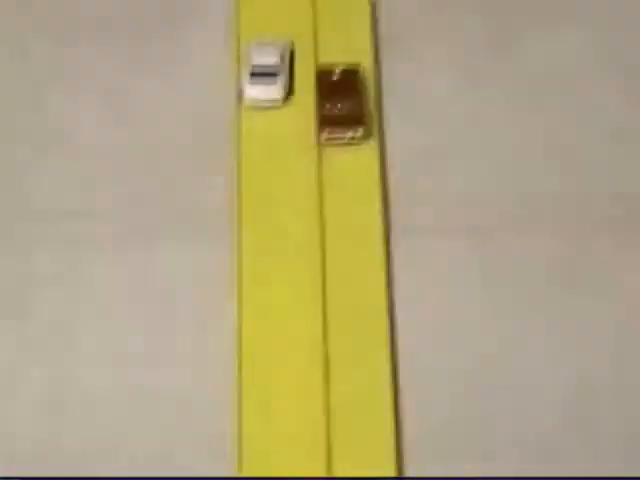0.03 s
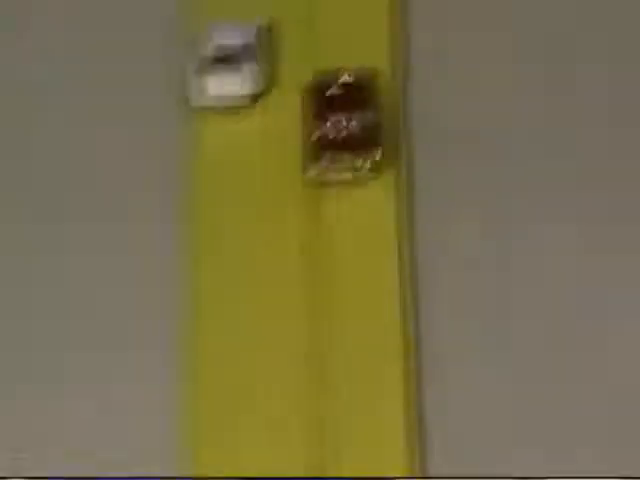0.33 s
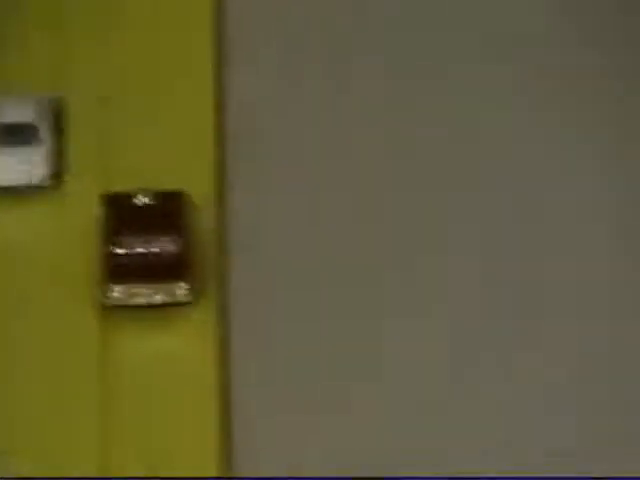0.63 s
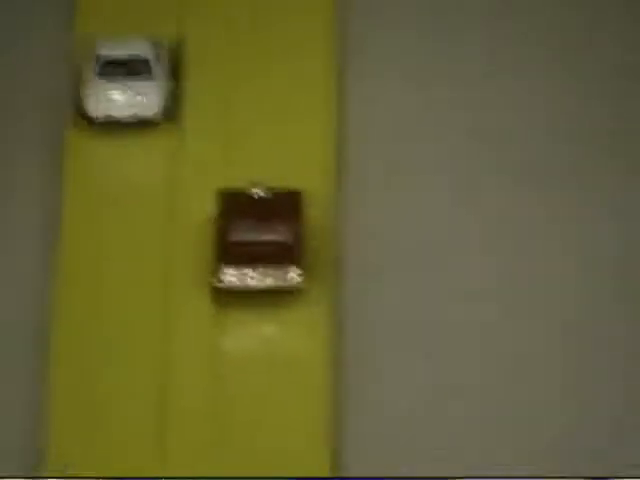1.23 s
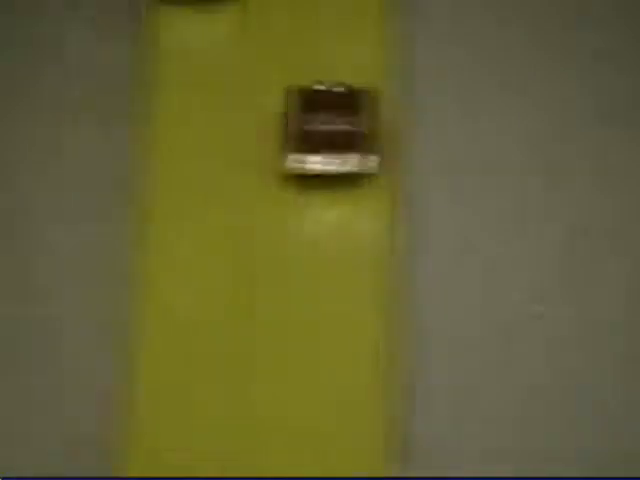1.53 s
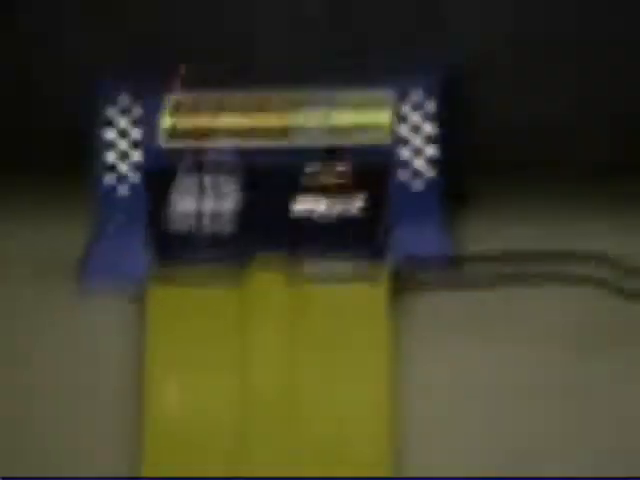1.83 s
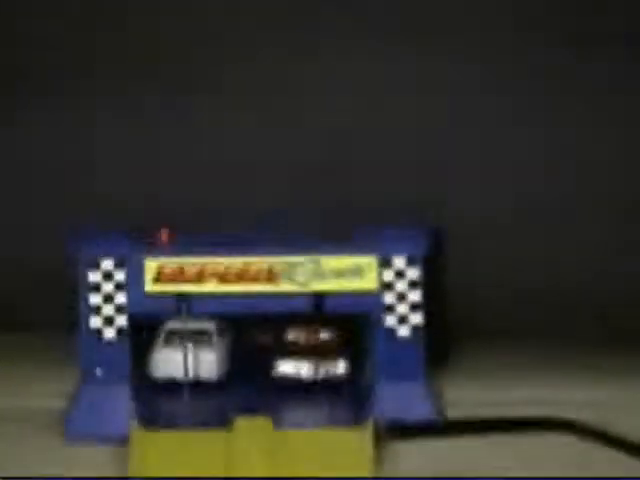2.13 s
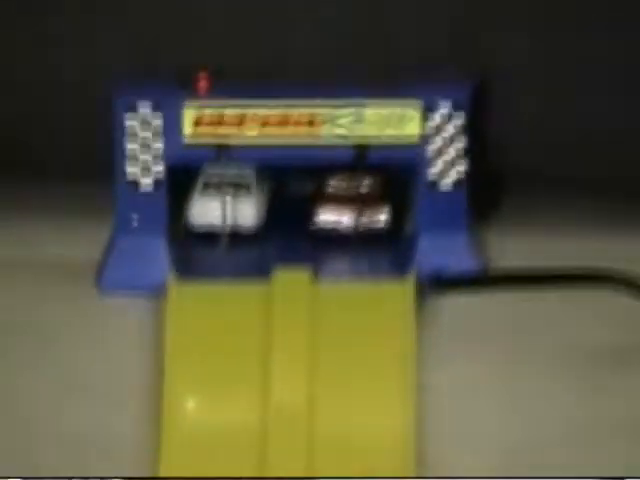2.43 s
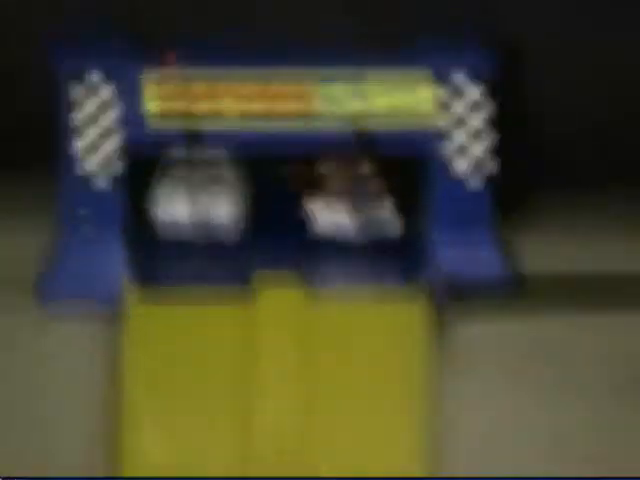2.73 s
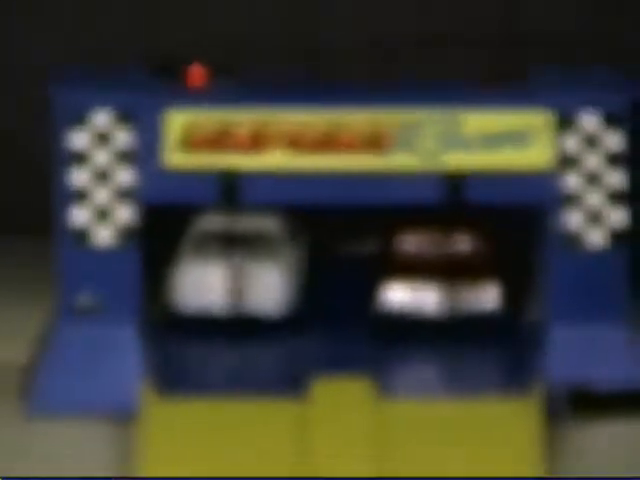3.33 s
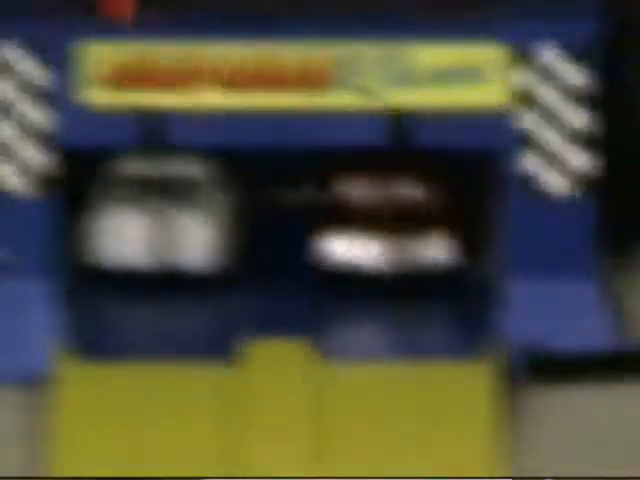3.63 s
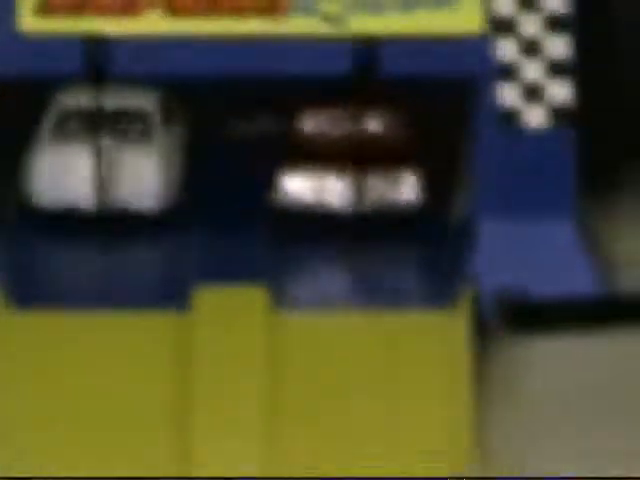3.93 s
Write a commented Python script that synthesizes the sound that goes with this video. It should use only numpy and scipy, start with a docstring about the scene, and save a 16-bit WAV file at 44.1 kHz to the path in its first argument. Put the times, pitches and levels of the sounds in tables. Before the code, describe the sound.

Small toy cars roll down a plastic track with a close, fizzing rattle, then click and thud to a stop. Three farther clacks ring in a hard-walled room, leaving quiet room noise and a brief knock on the microphone.

```python
"""Two toy cars race down a plastic track and click to a stop in the finish gate, a camera close behind.
Tiny random bumps make the wheels rattle, the axles fizz and, on the first stretch, the track drum.
After the stop, three farther clacks ring in the hard-walled room. Under it all lie quiet room noise
and the camera's faint whine, with a few hollow knocks of its case."""
import sys
import numpy as np
from scipy import signal
from scipy.fft import rfft, irfft
from scipy.io import wavfile

SR = 44100
rng = np.random.default_rng(int(sys.argv[2]) if len(sys.argv) > 2 else 0)


def persist_wave(psi):
    """Save psi, clipped to +-1, as 16-bit WAV."""
    counts = np.round(np.clip(psi, -1, 1) * 32767).astype(np.int16)
    wavfile.write(sys.argv[1], SR, np.atleast_2d(counts).T)


N = 176400

# Fader for the axles' treble. Each row: time in seconds, level in dB.
AXLE_LEVEL = [(0, -24.5), (.55, -25.5), (1.0, -28), (1.14, -29), (1.3, -29.5), (1.75, -28.5), (1.87, -32.5),
              (1.97, -30), (2.03, -37), (2.12, -67), (2.25, -85)]
# Tone of a small plastic click. Each row: frequency in Hz, relative level in dB.
CLICK_EQ = [(120, -27), (400, 2.5), (1300, 7), (3000, -4), (6000, 9), (8000, 7.5), (10000, 0),
            (12000, -7.5), (14500, -28)]
# Stereo image in the room. Each row: frequency in Hz, left-right likeness (1 is mono).
ROOM_LIKENESS = [(100, 0.59), (500, 0.91), (1400, 0.98), (3000, 0.91), (5500, 0.81), (9000, 0.37),
                 (13000, 0.32)]
BUMPS_PER_S, BUMP_SPREAD_DB = 1500, 2


def amp(db):
    """Decibels to gain."""
    return 10 ** (np.asarray(db) / 20)


def unit(x):
    """Scales to rms 1."""
    return x / np.sqrt(np.mean(x ** 2) + 1e-20)


def read(points, hz):
    """Reads a spectrum on a log-frequency axis."""
    f, value = np.transpose(points)
    return np.interp(np.log(hz + 1), np.log(f + 1), value)


def curve(rows, column=1):
    """One column of a control curve at every sample."""
    rows = np.array(rows)
    return np.interp(np.arange(N) / SR, rows[:, 0], rows[:, column])


def add(mix, start_s, sound):
    """Mixes a sound in at a time."""
    part = mix[max(round(start_s * SR), 0):][:len(sound)]
    part += sound[:len(part)]


def colour(x, eq):
    """Minimum-phase EQ of unit energy."""
    log_gain = np.log(amp(read(eq, abs(np.fft.fftfreq(4096, 1 / SR)))))
    taps = np.fft.ifft(np.exp(np.conj(signal.hilbert(log_gain)))).real[:2048]
    return signal.fftconvolve(x, taps / np.linalg.norm(taps))[:N]


def wander(hz):
    """Smooth random movement up to a rate, rms 1."""
    f = np.fft.rfftfreq(N, 1 / SR)
    return unit(irfft(rfft(rng.standard_normal(N)) * (f > 0) / (1 + (f / hz) ** 4), N))


def impacts(per_s, spread_db):
    """Random tiny blows of uneven size."""
    size = amp(spread_db * np.minimum(rng.exponential(1, N), 3))
    return unit(size * rng.choice([-1, 1], N) * (rng.random(N) < per_s / SR))


def pair(a, b, likeness):
    """Two unrelated signals become a left and right of the given likeness."""
    alike = np.clip(read(likeness, np.fft.rfftfreq(len(a), 1 / SR)), -1, 1)
    mid, side = rfft(a) * np.sqrt((1 + alike) / 2), rfft(b) * np.sqrt((1 - alike) / 2)
    return irfft([mid + side, mid - side], len(a))


def room(x):
    """Diffuse tail of a hard-walled room, each band dying at its own speed."""
    # Each row: frequency in Hz, seconds to fall 60 dB.
    reverb_times = [(200, 0.99), (800, 1), (2000, 0.84), (5500, 0.72), (12000, 0.4)]
    noise = rng.standard_normal((2, SR)) * (np.arange(SR) > .004 * SR)  # 4 ms pre-delay
    hz, t, bands = signal.stft(noise, SR, nperseg=256)
    decay = amp(-60 * t / read(reverb_times, hz)[:, None])
    tails = signal.istft(bands * decay, SR, nperseg=256)[1][:, :SR]
    stereo_tail = pair(*tails, ROOM_LIKENESS)
    return signal.fftconvolve(x[None], stereo_tail / np.linalg.norm(stereo_tail[0]), axes=1)


def in_room(x, wet_db):
    """Direct sound plus its tail."""
    return x + amp(wet_db) * room(x)[:, :N]


def snaps(hits, eq, decay_s, scatter, tick=1):
    """Hard little blows: a tick and a short burst of noise, whose gain is scatter."""
    out, t = np.zeros(N), np.arange(SR // 10) / SR
    for start_s, db in hits:
        burst = tick * (t == 0) + scatter * rng.standard_normal(len(t)) * np.exp(-t / decay_s)
        add(out, start_s, amp(db) * burst)
    return colour(out, eq)


def struck(hits, modes, attack_s=0.0011):
    """Soft blows ring damped modes, each with its own phase gap between left and right."""
    out, t = np.zeros((2, N)), np.arange(SR // 2) / SR
    attack = 1 - np.exp(-(t / attack_s) ** 2)
    for channel, side in zip(out, (-.5, .5)):
        ring = sum(amp(db - 60 * t / t60) * np.sin(2 * np.pi * hz * t + side * gap)
                   for hz, db, t60, gap in modes)
        for start_s, level_db in hits:
            add(channel, start_s, amp(level_db) * attack * ring)
    return out


def ringing(hz, flutter_db=2.5):
    """A resonance kept ringing by random bumps: a sine whose strength and phase wander."""
    phase = 2 * np.pi * (np.cumsum(hz * np.ones(N)) / SR + rng.random()) + .3 * wander(hz=8)
    return unit(amp(flutter_db * np.tanh(wander(hz=12))) * np.sin(phase))


def room_tone():
    """A quiet, wide bed of room noise and microphone hiss."""
    # Each row: frequency in Hz, relative level in dB.
    bed_eq = [(15, 10.5), (30, 18), (48, -1), (70, 7), (150, 2), (210, 2.5), (270, 8), (380, 4), (750, 1),
              (1050, 4), (2000, -4.5), (4000, -9.5), (7000, -14), (8500, -12), (11700, -16.5), (12500, -26),
              (15500, -31)]
    # Each row: frequency in Hz, left-right likeness.
    bed_likeness = [(30, 0.41), (200, 0.056), (1000, 0.033), (2000, 0.33), (7000, 0.097), (12000, .1)]
    return amp(-55.5) * pair(*[colour(rng.standard_normal(N), bed_eq) for side in range(2)], bed_likeness)


def camera_whine(hum_hz=996, buzz_hz=99.87):
    """The camera's wavering hum and its octave, a cluster of high tones and a thin buzz."""
    # Each row: time in seconds, level in dB.
    hum_level = [(2.4, -67), (2.68, -62), (3.0, -67), (3.16, -62), (3.22, -76), (3.33, -70), (3.44, -60),
                 (3.6, -73), (3.72, -63.5)]
    # Each row: frequency in Hz, level in dB.
    whine_tones = [(2697, -81), (3112, -79), (3295, -81), (3596, -81), (3898, -77), (4194, -80),
                   (4797, -79), (4888, -79), (5093, -77), (5873, -82), (6293, -79), (7854, -78),
                   (7881, -78), (8280, -84), (8446, -83), (9292, -84), (9593, -82), (10051, -86),
                   (10632, -85)]
    t = np.arange(N) / SR
    hum_phase = 2 * np.pi * hum_hz * t
    hum = amp(curve(hum_level) + 2 * wander(hz=12)) * np.sin(hum_phase + .5 * wander(hz=14))
    octave = amp(-74 + 3.5 * wander(hz=5)) * np.sin(2 * hum_phase + wander(hz=10))
    whine = sum(amp(db + 1.5 * wander(hz=3.4)) * np.sin(2 * np.pi * (hz * t + rng.random()))
                for hz, db in whine_tones)
    cycles = buzz_hz * t + .002 * wander(hz=6)
    buzz = sum(amp(-93 + 4 * rng.standard_normal()) * np.sin(2 * np.pi * (k * cycles + rng.random()))
               for k in range(20, 118))  # upper harmonics only
    return hum + octave + whine + buzz


def camera_knocks():
    """The camera's case knocks in the hand: a short crack and a hollow ring."""
    # Each row: start in seconds, relative level in dB.
    knocks = [(.9405, -16.5), (2.371, -42), (3.832, -52), (3.9845, -28.5), (3.9882, -30), (3.9903, -18)]
    # Each row: frequency in Hz, relative level in dB, seconds to fall 60 dB, phase gap in radians.
    case_modes = [(566, -18, 0.079, .3), (774, 2.5, 0.027, 0.66), (1127, 10.5, 0.05, 2.23),
                  (1904, -4, 0.018, 0.68), (2270, -6.5, 0.025, 0.81), (3270, -3.5, 0.014, 1.1),
                  (5730, -8, 0.011, 1)]
    # Each row: frequency in Hz, relative level in dB.
    crack_eq = [(100, -35), (300, -13), (800, 9), (1500, -6), (4500, -11), (9000, -13.5), (12000, -19),
                (14000, -43)]
    cracks = [snaps(knocks, crack_eq, decay_s=0.0025, scatter=0.27) for side in range(2)]
    return struck(knocks, case_modes) + amp(7.5) * pair(*cracks, ROOM_LIKENESS)


def far_clacks(bounce_s=0.018, bounce_db=-6, decay_s=.0045, dry_db=-5.5):
    """Plastic clacks with one quick bounce: a bright burst, then the room's darker, even answer."""
    # Each row: start in seconds, relative level in dB.
    clacks = [(2.276, -5.5), (2.496, -11), (2.747, -19)]
    # Tone of the burst and of the answer. Each row: frequency in Hz, relative level in dB.
    burst_eq = [(200, -24), (800, -15), (2000, 1), (4500, -1), (8000, 10), (10000, 2), (12000, -10),
                (14500, -22)]
    answer_eq = [(200, -15.5), (700, -2), (1350, 7), (2200, 5.5), (3300, 1), (4300, 4), (5400, 1),
                 (7200, 1), (10000, -2.5), (12000, -13), (14500, -26)]
    bounces = [(start_s + bounce_s, db + bounce_db) for start_s, db in clacks]
    direct = snaps(list(clacks) + bounces, burst_eq, decay_s, scatter=.1, tick=.2)
    answer = sum(room(snaps([clack], answer_eq, decay_s, scatter=0))[:, :N] for clack in clacks)
    return amp(dry_db) * direct + answer


def joints_and_gate():
    """The cars click against track joints and the gate, and enter the gate with dull thuds."""
    # Each row: start in seconds, relative level in dB.
    click_hits = [(.038, -6), (.120, -8), (.132, -8), (.209, -9), (.405, -9), (.730, -10), (1.135, -9),
                  (1.343, -9), (1.457, -11), (1.500, -10.5), (1.698, -5), (1.738, -5.5), (1.798, -9),
                  (1.867, -8.5), (1.904, -6.5), (1.928, -12), (1.965, -11.5), (2.056, -11)]
    thud_hits = [(1.737, -1.5), (1.762, -4), (1.802, -1), (1.85, -2.5), (1.975, -5.5)]
    # Each row: frequency in Hz, relative level in dB, seconds to fall 60 dB, phase gap in radians.
    gate_modes = [(196, -12, 0.16, .1), (322, 2, 0.075, 0.12), (430, 3, 0.23, 0.094),
                  (505, 1.5, 0.12, 0.11)]
    clicks = snaps(click_hits, CLICK_EQ, decay_s=.003, scatter=.17, tick=.3)
    return in_room(clicks, wet_db=-3) + amp(-32) * struck(thud_hits, gate_modes)


def track(bumps, swell_db=12, rise_per_s=.04):
    """The track drums; each resonance creeps upwards and swells where the cars drive it best."""
    # Each row: frequency in Hz, relative level in dB, peak time in seconds, swell length in seconds.
    track_modes = [(248.7, -11.5, .92, 0.22), (280, -11.5, 0.092, 0.18), (302, -9, 1.05, 0.076),
                   (321.2, -9, .64, 0.17), (326.8, -13, .17, 0.14), (336, -20, .89, 0.15),
                   (341.5, -12, 0.363, .22), (381.4, -13.5, 0.2, 0.16), (408, -13.5, .56, 0.11),
                   (431, -19, 0.305, 0.41), (451, -12.5, 0.42, 0.023), (468, -15, 0.96, 0.18),
                   (476, -20.5, .25, 0.26), (516.4, -11.5, 0.212, 0.16), (531, -16, .62, 0.14),
                   (572, -13.5, .59, 0.096), (570, -12, 0.7, 0.1), (613, -20.5, .66, 0.13),
                   (618, -24.5, 0.216, 0.39), (633, -14, 0.93, 0.035), (683.5, -21.5, .45, 0.12),
                   (710, -21, 0.238, 0.11), (747, -20.5, 0.023, 0.062)]
    # The lowest resonance. Each row: time in seconds, level in dB, frequency in Hz.
    lowest_mode = [(0, -22, 230), (.13, -30, 238), (.28, -29, 232), (.36, -18.5, 223), (.44, -30, 211),
                   (.53, -29, 201), (.66, -35, 201), (.8, -28, 208), (1.0, -21.5, 219), (1.12, -35, 219),
                   (1.25, -43, 219), (1.5, -63, 219), (2.1, -80, 219)]
    # Fader for the drumming. Each row: time in seconds, level in dB.
    drum_level = [(0, -12.5), (.5, -13), (.8, -12.5), (1.03, -15), (1.13, -28), (1.25, -48), (1.5, -61),
                  (2.2, -63)]
    # Each row: frequency in Hz, relative level in dB.
    thump_eq = [(120, -77.5), (175, -77), (215, 4), (250, -0.5), (340, -2), (560, -1), (720, -7.5),
                (1000, -24.5), (2000, -71)]
    ring = np.zeros(N)
    for hz, db, peak_s, swell_s in track_modes:
        from_peak = np.arange(N) / SR - peak_s
        swell = amp(db - swell_db * (np.hypot(1, from_peak / swell_s) - 1))
        ring += swell * ringing(hz * (1 + rise_per_s * from_peak))
    lowest = amp(curve(lowest_mode)) * ringing(curve(lowest_mode, column=2))
    fader = amp(curve(drum_level))
    thump = amp(-16.5) * fader * colour(bumps, thump_eq)
    return in_room(thump, wet_db=-1.5) + fader * ring + lowest


def loose_wheels(ticks_per_s=110, decay_s=.0015):
    """Eight loose wheels tick against their axles and the track walls."""
    t = np.arange(SR // 50) / SR
    bursts = [rng.standard_normal(len(t)) * np.exp(-t / decay_s) for wheel in range(8)]
    ticks = sum(signal.fftconvolve(impacts(ticks_per_s / len(bursts), spread_db=2), burst)[:N]
                for burst in bursts)
    return amp(curve(AXLE_LEVEL) - 12) * unit(colour(ticks, CLICK_EQ))


def wheel_rattle(bumps):
    """Bumps rattle the wheels, whose tone hardens towards the end of the drumming stretch."""
    # Each row: frequency in Hz, relative level in dB.
    early_eq = [(120, -71), (220, -11), (320, -11), (430, 2.5), (620, -7.5), (900, -5), (1260, 6.5),
                (1700, 2), (2100, -1), (2700, -0.5), (3700, -3), (5000, -21), (9000, -25.5), (14000, -83.5)]
    late_eq = [(120, -49.5), (220, -22.5), (320, -9.5), (425, -7.5), (600, -13.5), (900, -5.5), (1260, 3),
               (1700, 0.5), (2100, -2), (2700, -1), (3700, -4), (5000, -17), (9000, -24), (14000, -72.5)]
    late = np.interp(np.arange(N) / SR, [0.4, 1], [0, 1])  # crossfade from 0.4 to 1 s
    return (1 - late) * colour(bumps, early_eq) + late * colour(bumps, late_eq)


def moving_in_room(direct, wet_db, morph_hz=1.135):
    """The room, already ringing from the run-up, answers differently as the cars move."""
    lead = SR // 2
    run = np.r_[direct[0, :lead][::-1], direct.mean(0)]  # the opening, mirrored, is the run-up
    angle = 2 * np.pi * morph_hz * np.arange(len(run)) / SR
    tail = room(run * np.cos(angle)) + room(run * np.sin(angle))  # two different reverbs in turn
    return (direct + amp(wet_db) * tail[:, lead:lead + N]) / np.hypot(1, amp(wet_db))


def wheels(bumps, grit_per_s=4600, grit_spread_db=1.5):
    """The rolling cars: bumps rattle the wheels and finer grit makes the axles fizz."""
    # Fader for the rattle as the cars run and slow. Each row: time in seconds, level in dB.
    rattle_level = [(0, -18.5), (.35, -19.5), (.6, -18.5), (1.0, -21.5), (1.3, -23), (1.78, -23.5),
                    (1.88, -28), (1.98, -29), (2.04, -36.5), (2.12, -45.5), (2.25, -109)]
    # Each row: frequency in Hz, relative level in dB.
    axle_eq = [(800, -23), (2500, -0.5), (4000, 8.5), (5200, 2.5), (6800, 0.5), (8000, -6), (9500, -5),
               (11500, -15), (13000, -27), (14500, -75)]
    grit = unit(impacts(grit_per_s, grit_spread_db) + 0.66 * bumps)
    flicker = unit(amp(1.5 * np.tanh(wander(hz=49.7))))
    side_bumps = impacts(BUMPS_PER_S, BUMP_SPREAD_DB)  # separate blows give stereo width
    side_grit = impacts(grit_per_s, grit_spread_db)
    rattle = pair(wheel_rattle(bumps), wheel_rattle(side_bumps), ROOM_LIKENESS)
    fizz = pair(colour(grit, axle_eq), colour(side_grit, axle_eq), ROOM_LIKENESS)
    direct = rattle * amp(curve(rattle_level)) + fizz * amp(curve(AXLE_LEVEL)) * flicker
    return moving_in_room(direct, wet_db=-4)


def scene():
    """The run, the stop at the gate and the clacks after it; wheels and track share the same bumps."""
    bumps = impacts(BUMPS_PER_S, BUMP_SPREAD_DB)
    jolts = amp(1.5 * np.tanh(wander(hz=46)))
    bumps = unit(bumps * jolts)
    race = joints_and_gate() + wheels(bumps) + loose_wheels() + track(bumps)
    return race + far_clacks() + camera_knocks() + room_tone() + camera_whine()


def record(dry):
    """The camera's band limit: a steep low-pass at 14.3 kHz."""
    lowpass = signal.firwin(255, 14300, window=("kaiser", 8), fs=SR)
    return signal.oaconvolve(dry, lowpass[None], "same")


dry = scene()
out = record(dry)
persist_wave(out)
```